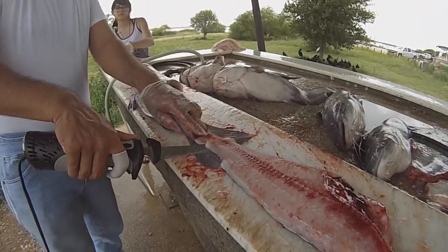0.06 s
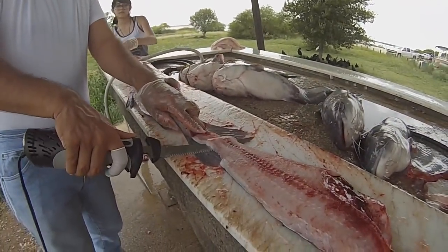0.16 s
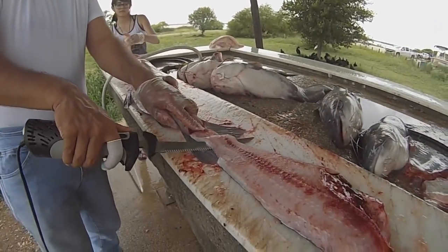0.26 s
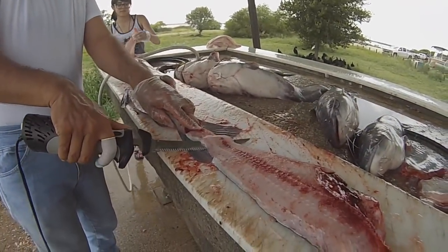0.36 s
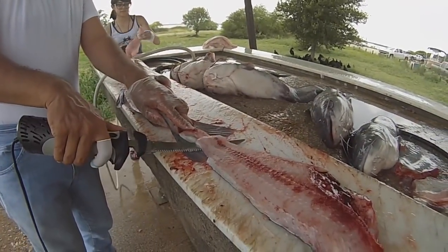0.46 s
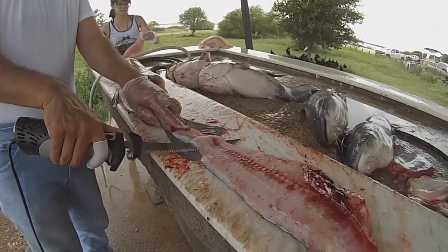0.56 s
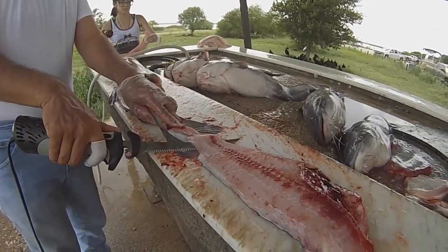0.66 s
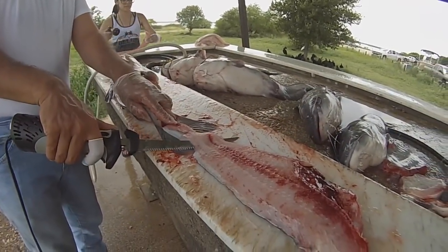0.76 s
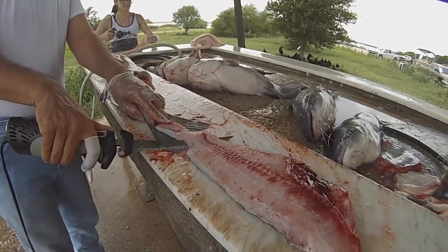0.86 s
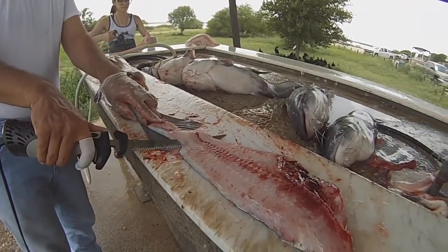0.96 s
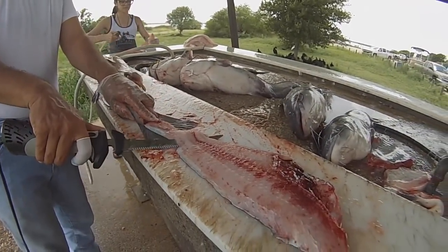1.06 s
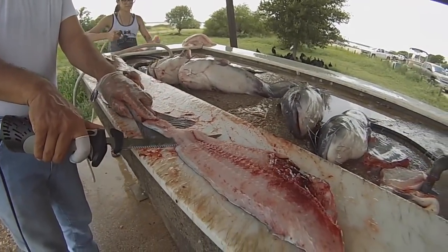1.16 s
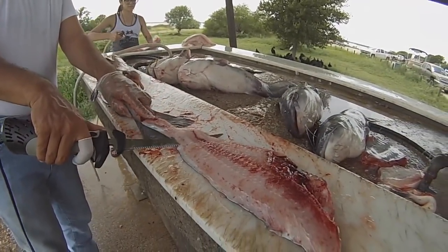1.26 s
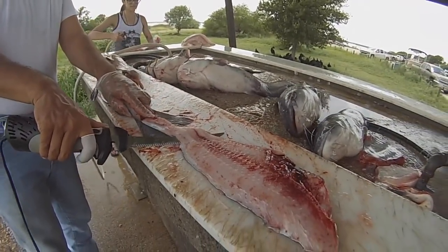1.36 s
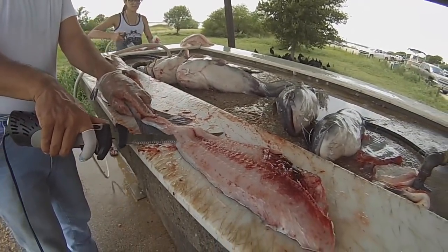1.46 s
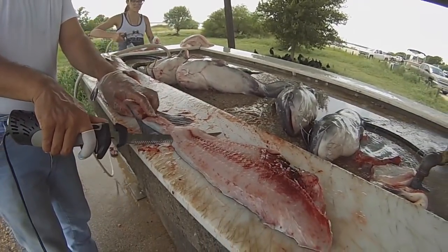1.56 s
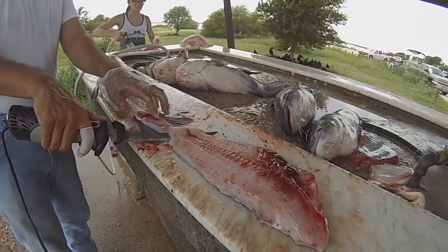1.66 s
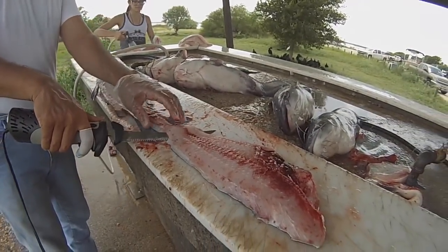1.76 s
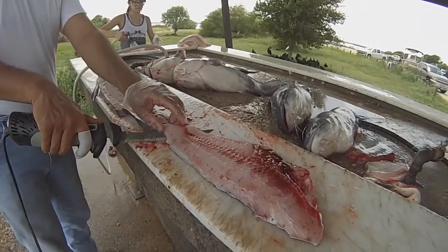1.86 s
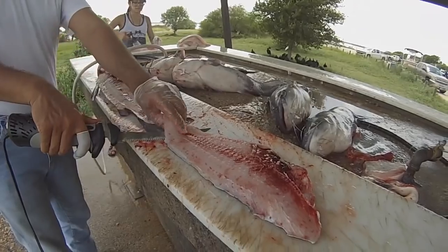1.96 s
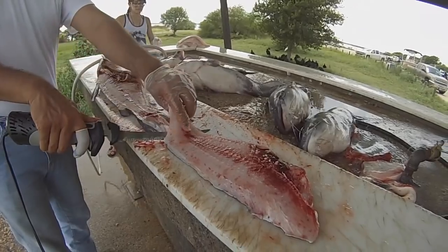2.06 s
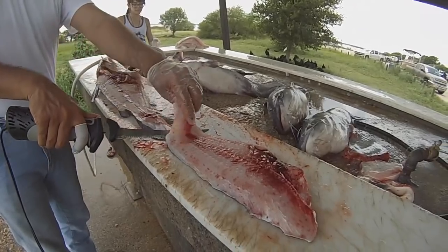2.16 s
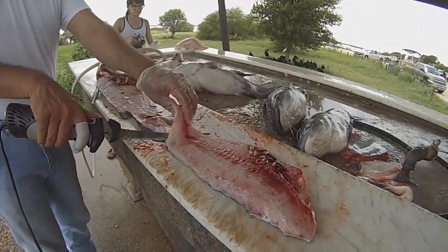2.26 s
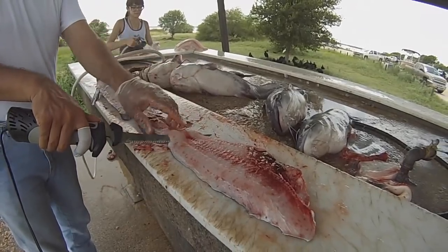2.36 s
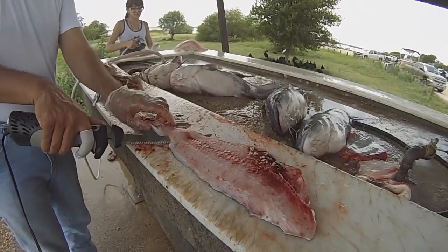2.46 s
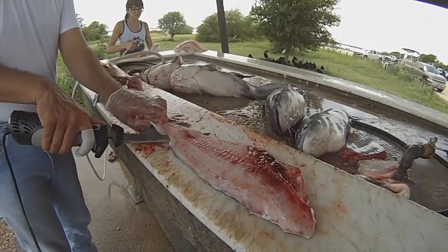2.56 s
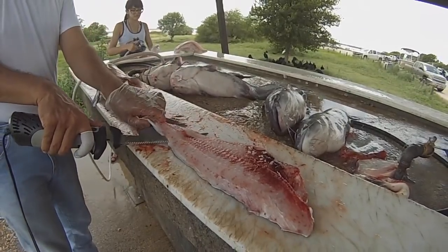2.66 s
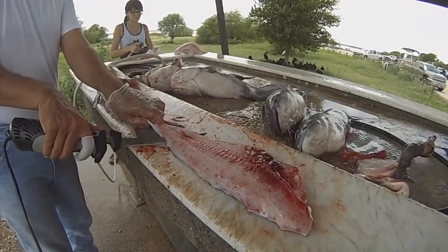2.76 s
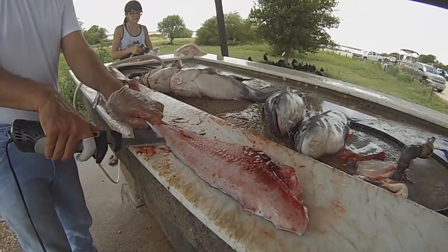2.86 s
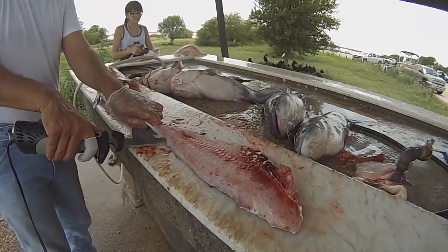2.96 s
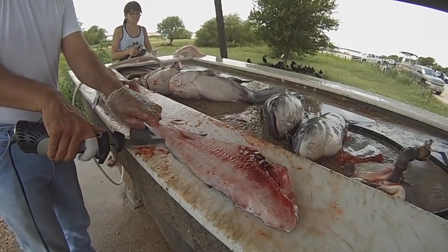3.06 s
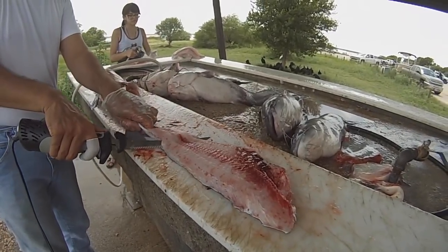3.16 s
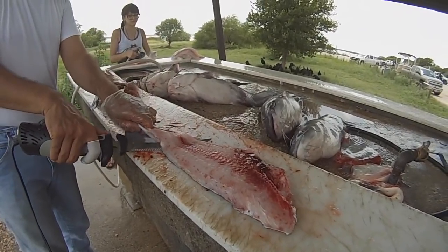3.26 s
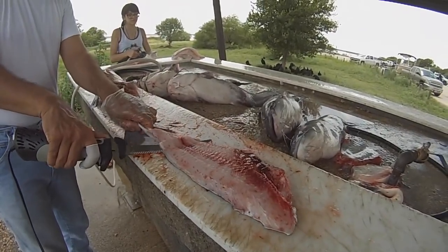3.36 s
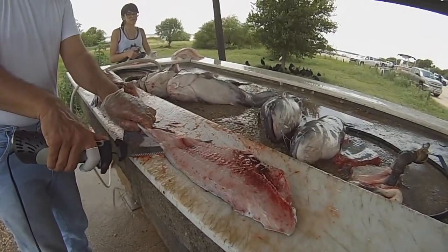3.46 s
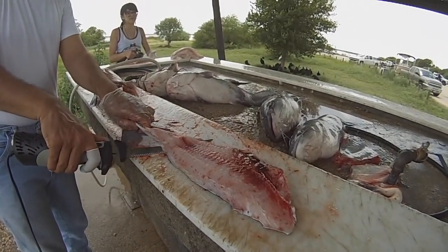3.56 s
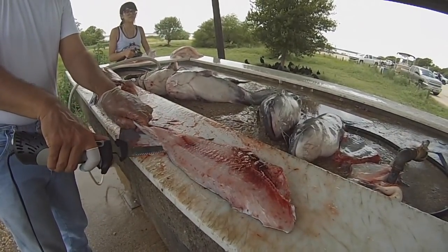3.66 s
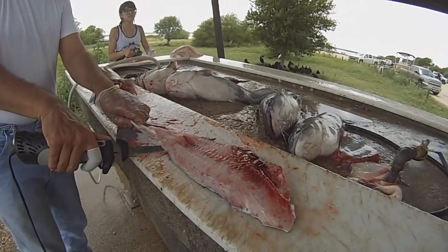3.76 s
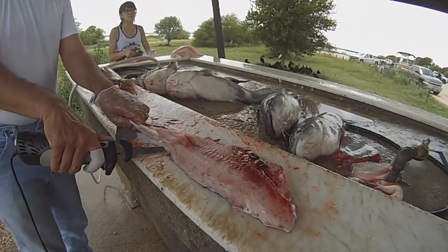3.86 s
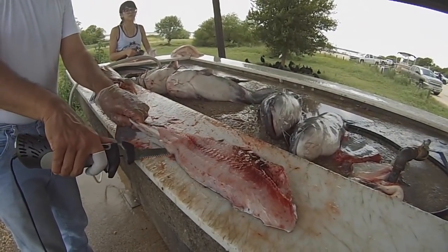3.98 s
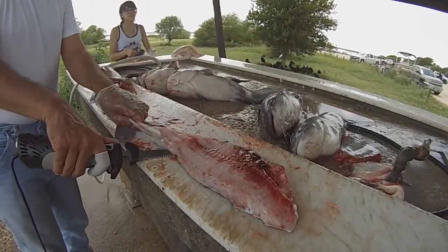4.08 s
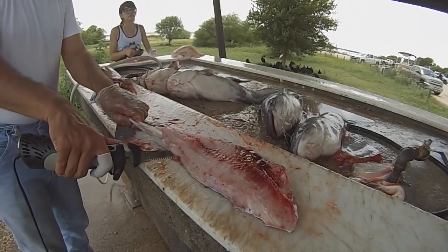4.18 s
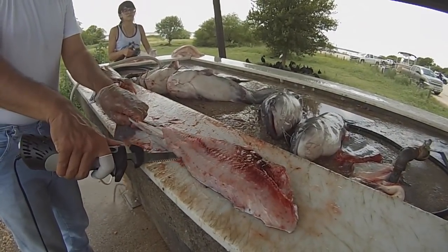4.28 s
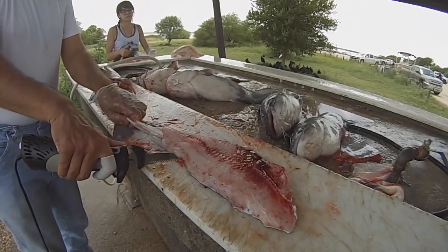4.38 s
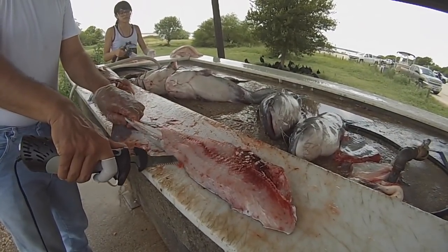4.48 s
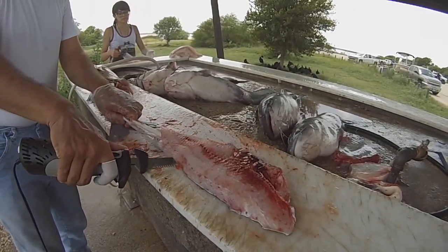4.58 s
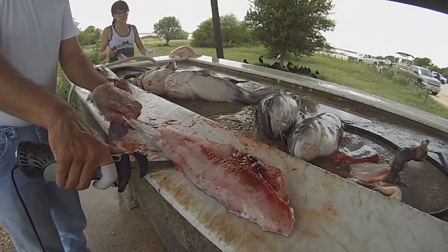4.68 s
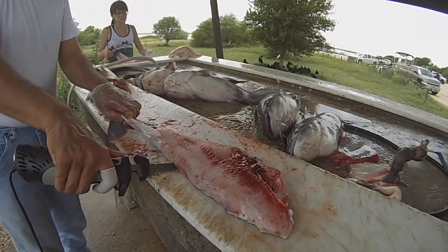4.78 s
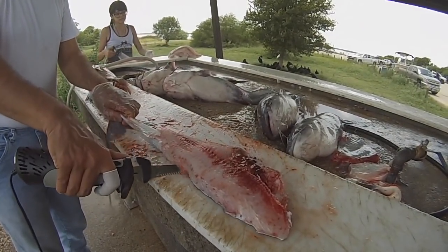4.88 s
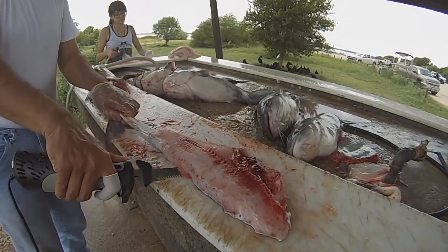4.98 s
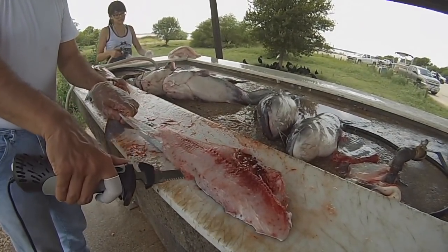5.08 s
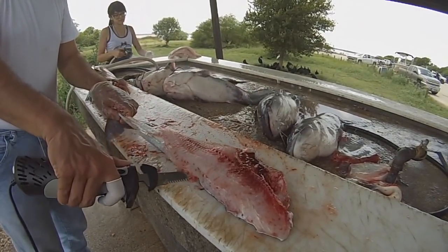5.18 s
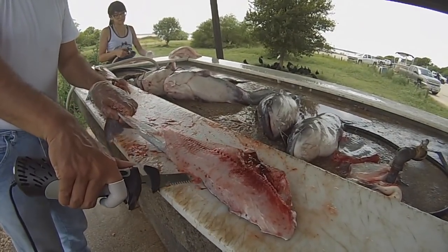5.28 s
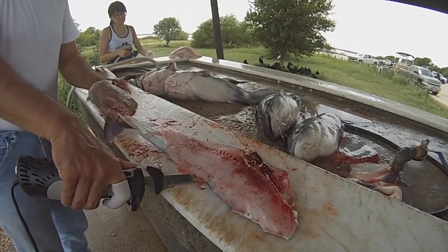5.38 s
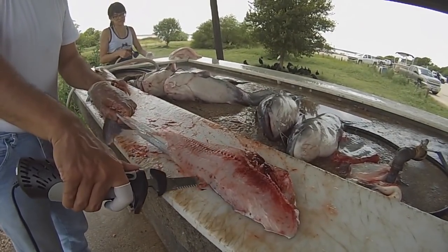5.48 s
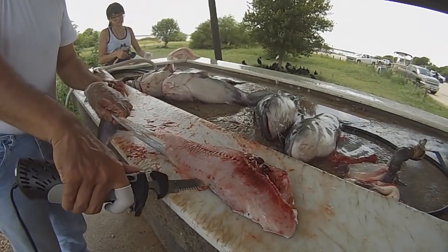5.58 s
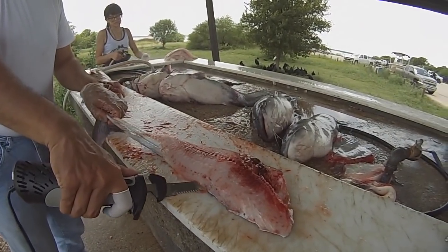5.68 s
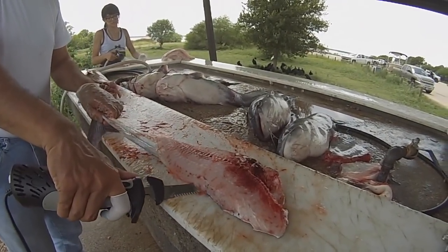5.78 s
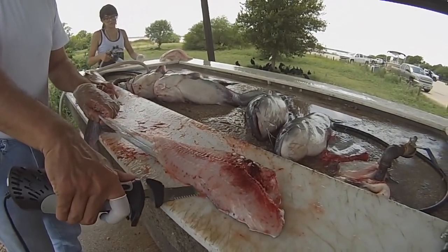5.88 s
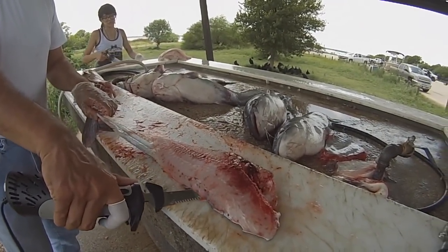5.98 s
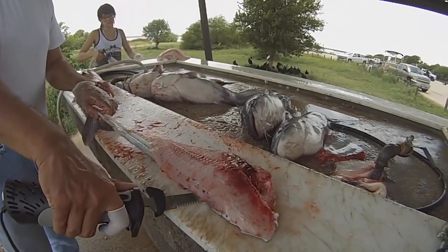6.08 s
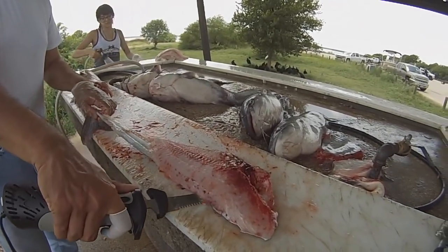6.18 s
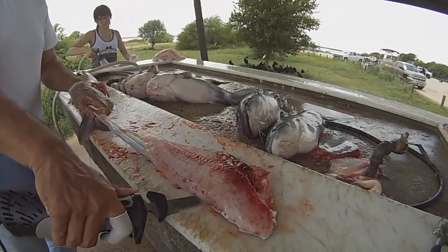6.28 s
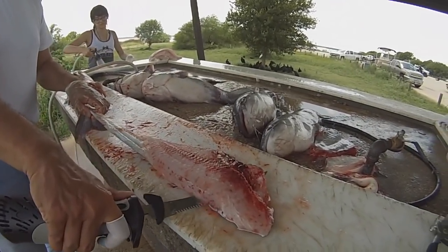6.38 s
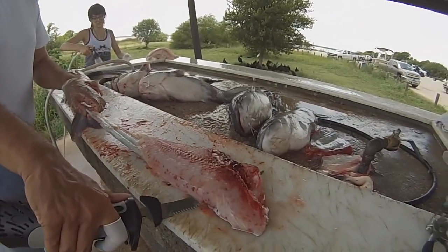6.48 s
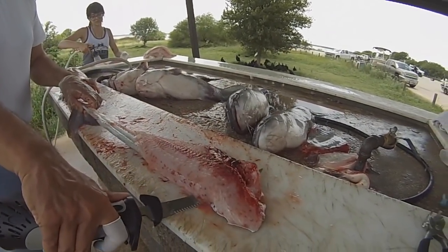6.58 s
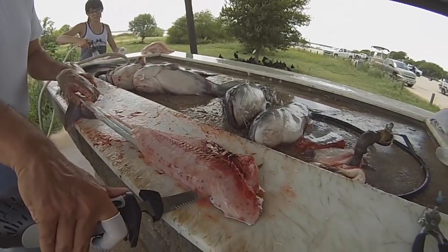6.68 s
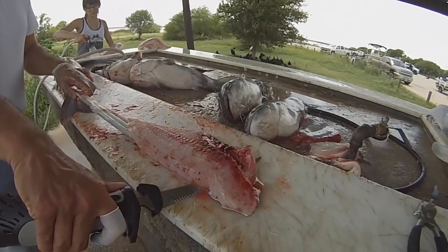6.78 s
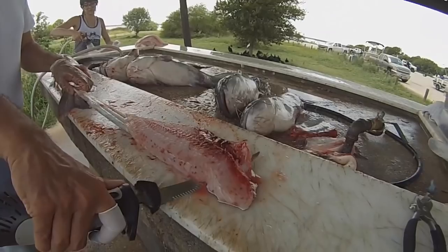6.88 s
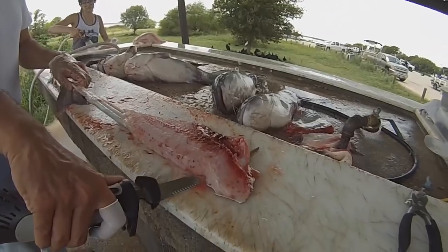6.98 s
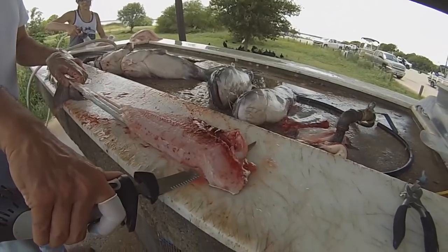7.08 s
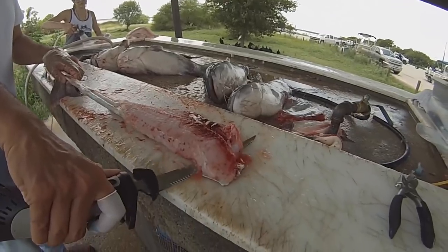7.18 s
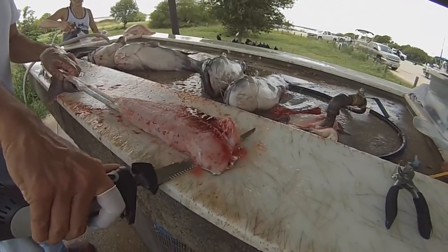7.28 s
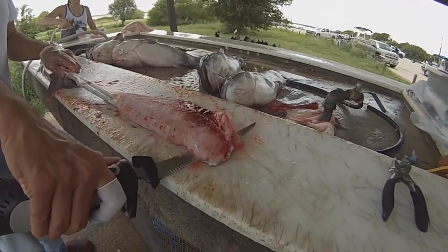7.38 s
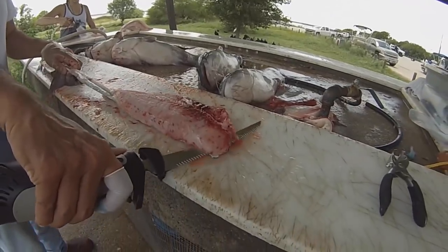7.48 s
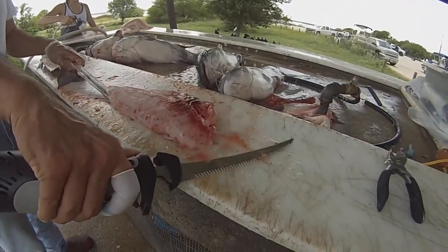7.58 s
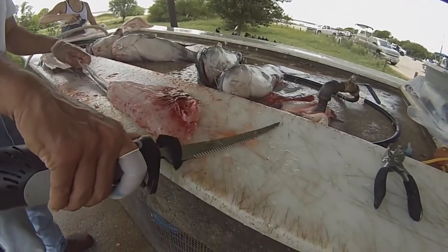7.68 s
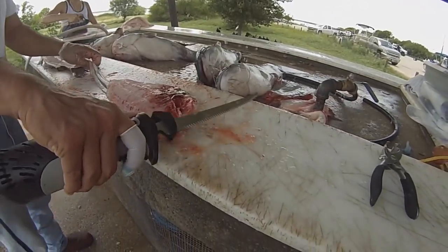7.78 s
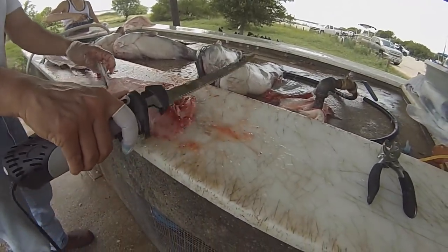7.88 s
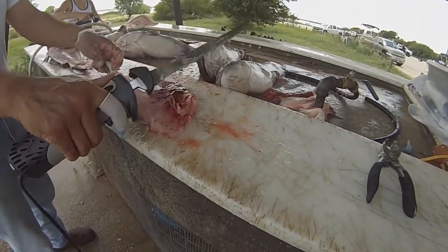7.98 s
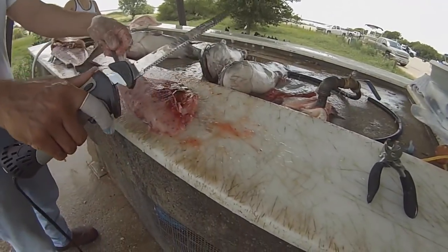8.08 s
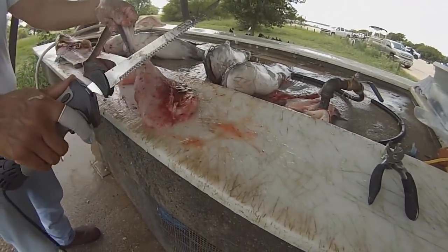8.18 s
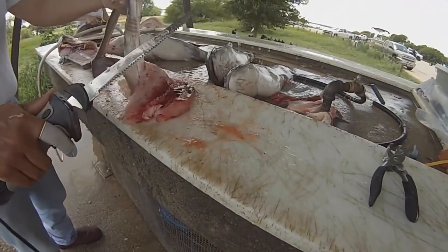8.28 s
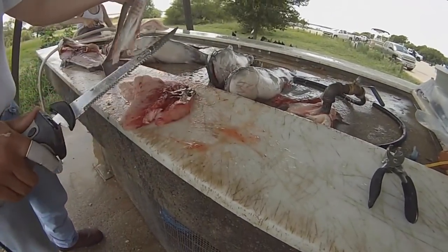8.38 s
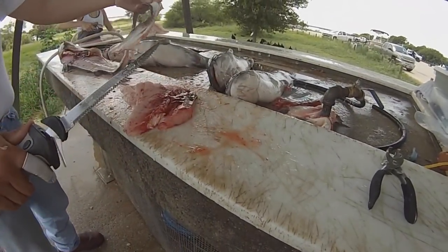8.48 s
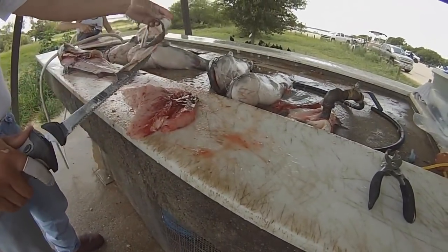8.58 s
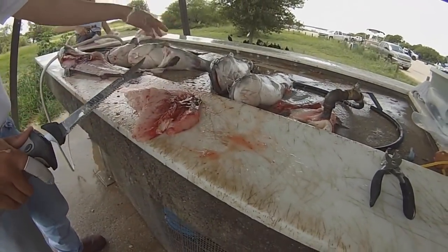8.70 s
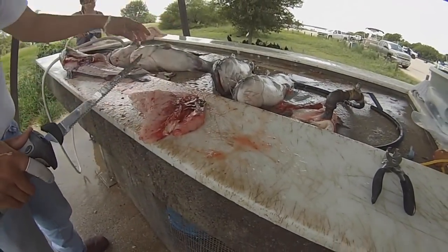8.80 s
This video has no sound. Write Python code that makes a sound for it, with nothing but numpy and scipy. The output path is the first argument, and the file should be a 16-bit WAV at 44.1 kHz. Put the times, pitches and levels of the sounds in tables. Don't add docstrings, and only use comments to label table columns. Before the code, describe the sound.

Close up, an electric fillet knife runs with a harsh plastic grind, whine and rapid clacking. The trigger is released and squeezed in short bursts, so the pitch sags and recovers. It coasts down into irregular knocks and near quiet, then a long cut grinds steadily, blades slapping, before a bright rattle, hard jolts and a slowing finish. Faint wind, insect hiss and a distant pump hum lie beneath, in open air.

```python
import sys
import numpy as np
from scipy import signal
from scipy.fft import rfft, irfft, next_fast_len
from scipy.io import wavfile
from scipy.ndimage import uniform_filter1d, map_coordinates

SR = 44100
rng = np.random.default_rng(int(sys.argv[2]) if len(sys.argv) > 2 else 0)


def digitize_waveform(pressure):
    field = np.atleast_2d(pressure).T
    bounded = np.clip(field, -1, 1)
    quanta = np.round(bounded * 32767).astype(np.int16)
    wavfile.write(sys.argv[1], SR, quanta)


def ratio_of_db(decibels):
    return 10 ** (np.asarray(decibels, float) / 20)


N = 389844
SECONDS = np.arange(N) / SR

# frequency in Hz, level in dB per Hz.
OUTDOORS = [(18, -57), (30, -5), (45, -0.5), (120, -8), (200, -16), (310, -13.5), (480, -23), (800, -17.5),
            (1300, -37), (3500, -28.5), (5500, -40), (9200, -33), (10400, -20.5), (11600, -35.5)]
# frequency in Hz, level in dB.
PUMP = [(122, -55), (152, -53.5)]
# delay in seconds, level in dB.
TABLE_ECHOES = [(.0011, -41.5), (.0027, -30), (.0052, -24.5), (.009, -22.5), (.014, -34)]

# squeezed in seconds, released in seconds.
TRIGGER = [
    (-1, .434),
    (.618, .962),
    (1.213, 1.523),
    (2.904, 7.962),
]
# time in seconds, shaft speed in Hz.
LOADED_SPEED = [(.14, 299), (.24, 355), (.8, 370), (1.4, 360), (3.1, 346), (3.6, 384.3), (4.4, 369.7),
                (5.1, 353.8), (6.2, 344.8), (6.6, 349.6), (7.1, 339.8), (7.5, 337.7), (7.8, 394)]
# time in seconds, nearness in dB, blades turned to the listener in dB,
# bite into the fish from 0 to 1, hollow of the handle in Hz.
HAND = [(0, -25, 2.5, 0.4, 1040), (.11, -24, -3.5, 0.4, 1040), (.16, -19.5, -3.5, 1, 1035),
        (.3, -25.5, 2, 0.5, 1045), (1.7, -25.5, 1, 0, 1042), (2.05, -29, 0.5, 1, 1068),
        (2.45, -28.5, -4.5, 0.4, 1050), (2.8, -24.5, -4, 0.7, 980), (3.08, -24, -1.5, 0.4, 1040),
        (3.55, -27.5, 2.5, 0, 1066), (4.45, -26.5, 0.5, .4, 1165), (4.9, -23.5, -1, 1, 1193),
        (6, -23, -1, 1, 1125), (7.5, -24, 1, 0.86, 1060), (7.75, -19.5, 0.5, 0.8, 960),
        (7.92, -19, 1, 0.5, 1160), (8.5, -22, 0, 0, 990), (8.84, -25.5, 2.5, 0, 970)]

# frequency in Hz, level in dB per Hz.
HOUSING = [(150, -34), (250, -11), (350, -13.5), (600, -4.5), (900, -3.5), (1400, -3.5), (1700, -3),
           (2050, -2.5), (2300, -6.5), (3500, -0.5), (5200, -6), (7300, -14), (9500, -18), (15500, -27.5)]
# frequency in Hz, width in Hz.
GRIP_HOLLOWS = [(920, 160), (1040, 147), (1160, 226)]
# frequency in Hz, width in Hz, lift in dB.
VENTS = [(1677, 140, 3), (2020, 61, 3), (8180, 330, 3.5), (10750, 440, 8), (14000, 1200, 7)]
# frequency in Hz, width in Hz, lift in dB.
SHELL_PEAKS = [(1020, 100, 6), (2660, 350, 10), (5250, 500, 12), (8150, 350, 9), (11950, 350, 8),
               (13800, 700, 6), (15000, 500, 4)]
# start in seconds, end in seconds, frequency in Hz, dB over the handle.
FREED_RIBS = [(.2, 1.75, 1057, -8.5), (3.0, 3.8, 1690, -13), (4.6, 5.4, 1150, -13), (5.7, 6.4, 1080, -12.5),
              (7.85, 8.35, 2000, -12.5), (8.55, 8.8, 937, -1.5)]

# multiple of shaft speed, level in dB.
WHINE = [(1, -46), (2, -54), (3, -43), (4, -49), (7.67, -52.5), (8, -52), (16, -51), (24, -60), (32, -63),
         (40, -59)]
# start in seconds, end in seconds, lift in dB, fade in seconds.
SINGING = [(.22, .38, 3, .05), (.64, .8, 3, .05), (1.3, 1.4, 3, .05), (3.15, 3.35, 3, .1),
           (6.9, 7.5, 3.5, .3)]
# frequency in Hz, level in dB.
CRANK_HUM = [(120, -53), (170, -53), (230, -60), (300, -55), (420, -47), (560, -45), (650, -49), (820, -42),
             (930, -47), (1090, -39), (1200, -43), (1350, -52)]

# frequency in Hz, width in Hz, level in dB.
SLAP_MODES = [(1150, 230, -20.5), (1970, 270, -12.5), (3710, 270, 1), (4085, 420, -1), (5130, 370, -7),
              (6460, 400, -10.5)]
# start in seconds, end in seconds, lift in dB, fade in seconds.
SLAPPING = [(.125, 0.228, 22.5, .02), (.5, 1.1, 11.5, 0.22), (1.8, 1.907, 16.5, 0.072),
            (4.6, 4.8, 17, 0.075), (4.878, 5.93, 21.5, 0.061), (4.9, 5.3, 2.5, .15),
            (6.02, 6.468, 22, 0.072), (6.543, 6.678, 16.5, 0.054), (8.252, 8.33, 16, 0.12)]
# frequency in Hz, width in Hz, level in dB.
TIP_MODES = [(7970, 130, 0)]
# start in seconds, end in seconds, lift in dB, fade in seconds.
TICKING = [(.27, .6, 8.6, 0.23), (3.9, 4.68, 11.6, 0.23), (6.7, 7.6, 5, 0.34), (7.75, 8.2, 9, 0.13)]
# frequency in Hz, width in Hz, level in dB.
RATTLE_MODES = [(5000, 1000, 5), (8000, 1000, -2), (9900, 660, 1), (13800, 1300, 0)]
# start in seconds, end in seconds, lift in dB, fade in seconds.
RATTLING = [
    (.35, .5, 10, .15),
    (3.35, 3.6, 17.5, .15),
    (7.7, 8.84, 20, 0.075),
]

# time in seconds, peak in dB, blades in dB over the handle
KNOCKS = [(2.003, -33, -6), (2.072, -10, -5), (2.095, -12, -8), (2.118, -13.5, -6), (2.168, -14, -10),
          (2.25, -12.5, -3), (2.28, -16, -7), (2.314, -15.5, -7), (2.351, -19, 0), (2.385, -16.5, -7),
          (2.4, -18.5, -5), (2.455, -31, -5), (2.49, -28, -10), (2.522, -24, -2), (2.593, -20, -4),
          (2.655, -27, 0), (2.69, -33, 2), (2.81, -29, 0), (2.896, -28, -8), (2.953, -19, -4),
          (2.981, -17, -4), (3.02, -13, -2)]
# time in seconds, peak in dB, blades in dB over the handle.
JOLTS = [(0.467, -3, 16.5), (0.994, -9, 22), (1.615, -7, 6), (1.64, -1.5, 13.5), (3.102, -5.5, -5),
         (3.132, -11, 20.5), (4.946, -0.5, 8), (4.969, -5, 14), (7.891, 1, 4), (7.912, -1, 19), (8, -6, 20),
         (8.354, -6, 7)]
# time in seconds, peak in dB, blades in dB over the handle.
LAST_KNOCKS = [(8.477, -12, 18), (8.585, -9, -18), (8.624, -10, -12), (8.669, -18, -16), (8.689, -13, -16),
               (8.711, -14, -7), (8.762, -10, 15), (8.786, -19, -11), (8.815, -8.5, 0)]

RATED_HZ = 350
TURNS_PER_REVERSAL = 4.17
SLAP_DB_PER_OCTAVE = 1


def unit(x):
    return x / np.sqrt(np.mean(x ** 2) + 1e-20)


def curves(rows):
    times, *columns = np.transpose(rows)
    return [np.interp(SECONDS, times, column) for column in columns]


def spells(rows):
    total_db = 0
    for start, end, db, fade_s in rows:
        inside_s = np.minimum(SECONDS - start, end - SECONDS)
        total_db = total_db + db * np.clip(inside_s / max(fade_s, .01) + 1, 0, 1)
    return total_db


def wobble(rate):
    coarse = np.arange(0, N + 32, 32)
    knots = rng.standard_normal(int(N * rate / SR) + 4)
    return np.interp(np.arange(N), coarse, map_coordinates(knots, [coarse * rate / SR]))


def scatter():
    return rng.uniform(-0.88, 1, N)


def spectrum_size():
    return 2 * next_fast_len(N // 2 + 4096)


def filtered(x, response):
    m = spectrum_size()
    return irfft(rfft(x, m) * response(np.fft.rfftfreq(m, 1 / SR)), m)[:N]


def colour(points):
    def response(hz):
        f, db = np.transpose(points)
        gain_db = np.interp(np.log(hz + 1), np.log(f), db)
        cepstrum = irfft(np.log(ratio_of_db(np.maximum(gain_db, -90))))
        cepstrum[1:len(hz) - 1] *= 2
        cepstrum[len(hz):] = 0
        return np.exp(rfft(cepstrum))
    return response


def modes(rows):
    def response(f):
        total = 0
        for k, (hz, width, db) in enumerate(rows):
            damping = 1j * f * width
            total = total + (-1) ** k * ratio_of_db(db) * damping / (hz * hz - f * f + damping)
        return total
    return response


def lift_db(rows, hz):
    return sum(db / (1 + ((hz - c) / (w / 2)) ** 2) for c, w, db in rows)


def bursts(sizes, decay_s, loose):
    fade = np.exp(-1 / (SR * decay_s))
    tail = signal.lfilter([1], [1, -fade], sizes) * rng.standard_normal(N)
    return sizes + loose * np.sqrt(1 - fade ** 2) * tail


def outdoors():
    air = unit(filtered(rng.standard_normal(N), colour(OUTDOORS)))
    sound = ratio_of_db(-42.5 + 0.22 * wobble(0.89)) * air
    for hz, db in PUMP:
        hum = np.sin(2 * np.pi * hz * SECONDS + 1.8 * wobble(6))
        sound += ratio_of_db(db + 1.5 * wobble(5.5)) * np.sqrt(2) * hum
    return sound


def motor():
    step_s, finger_s, start_hz = .002, .08, 294.6
    lag_at_rest_s, lag_at_rated_s = .095, .149
    friction_hz_per_s, drag_s = 160, 1.88
    s = np.arange(0, N / SR + step_s, step_s)
    power = 0
    for squeezed, released in TRIGGER:
        pressed = np.clip((s - squeezed) / finger_s + .5, 0, 1)
        power = power + pressed * np.clip((released - s) / finger_s + .5, 0, 1)
    speed = [start_hz]
    for on, aim in zip(power, np.interp(s, *np.transpose(LOADED_SPEED))):
        hz = speed[-1]
        lag_s = lag_at_rest_s + (lag_at_rated_s - lag_at_rest_s) * hz / RATED_HZ
        driven = on * (aim - hz) / lag_s
        coasting = (1 - on) * (friction_hz_per_s + hz / drag_s)
        speed.append(hz + step_s * (driven - coasting))
    return np.interp(SECONDS, s, speed[1:]), np.interp(SECONDS, s, power)


def tooth_grind(speed, stroke):
    load_db = 0.16 + 6.6 * (1 - speed / speed.max())
    chatter_db = 1.23 * wobble(250) + 0.4 * wobble(30)
    return unit(ratio_of_db(load_db * np.cos(2 * np.pi * (stroke - .2)) + chatter_db) * rng.standard_normal(N))


def crank_clacks(reversal, push_return_db):
    clacks = bursts(reversal * ratio_of_db(4.3 * scatter() + push_return_db), 0.0034, loose=4.2)
    return clacks / np.sqrt(np.abs(uniform_filter1d(clacks ** 2, size=9000)) + 1e-4)


def zones(x):
    m = spectrum_size()
    hz = np.fft.rfftfreq(m, 1 / SR)
    shell = rfft(x, m) * colour(HOUSING)(hz) * ratio_of_db(lift_db(VENTS, hz))
    low, mid, high = [1 / (1 + (hz / edge_hz) ** 10) for edge_hz in (750, 2300, 7000)]
    butt, handle, blades, vents = irfft(shell * [low, mid - low, high - mid, 1 - high], m)[:, :N]
    rings = irfft([shell * modes([(c, w, 0)])(hz) for c, w in GRIP_HOLLOWS], m)[:, :N]
    place = np.interp(curves(HAND)[-1], [c for c, w in GRIP_HOLLOWS], range(len(GRIP_HOLLOWS)))
    hollow = sum(np.sqrt(np.clip(1 - abs(place - k), 0, 1)) * ring for k, ring in enumerate(rings))
    return butt, handle + 1.55 * hollow, blades, vents


def shaken_shell(shake, octaves, power, slap_db):
    near_db, turn_db, _, _ = curves(HAND)
    handle_db = near_db + 10 * octaves + 0.56 * wobble(14)
    handle_db -= 4.5 * np.minimum(3 * power, 1) * np.minimum(octaves + 0.65, 0)
    butt_db = -11.5 + 1.4 * wobble(8) - 0.095 * spells(RATTLING)
    held_db = 0.63 * np.clip((slap_db + 34.0) / 12, 0, 1)
    blades_db = -3.5 + turn_db - held_db
    vents_db = -11.5 + 1.24 * turn_db
    parts = zones(shake)
    levels = [butt_db, 0, blades_db, vents_db]
    sound = sum(ratio_of_db(handle_db + db) * unit(part) for part, db in zip(parts, levels))
    for start, end, rib_hz, db in FREED_RIBS:
        rib = unit(signal.lfilter(*signal.iirpeak(rib_hz, 14, SR), parts[1]))
        sound += ratio_of_db(handle_db + db - 30 + spells([(start, end, 30, .15)])) * rib
    return sound


def slow_gain(db):
    return np.repeat(ratio_of_db(db), 16)[:N]


def armature_whine(speed, turns, stroke, octaves, power):
    bite = curves(HAND)[2]
    whine_db = 7.5 * octaves - 2.5 * (1 - power)
    sing_db = spells(SINGING)
    shaft_db = 2.5 * (bite - .25) + 1.4 * (1 - power)
    shake = np.sin(2 * np.pi * stroke)
    sound = np.zeros(N)
    for multiple, db in WHINE:
        phase = 2 * np.pi * multiple * turns + .012 * multiple * shake + .5 * wobble(25)
        level_db = whine_db + (sing_db if multiple > 4 else shaft_db) + 1.2 * wobble(6)
        peak_db = lift_db(SHELL_PEAKS, multiple * speed[::16])
        sound += slow_gain(db + level_db[::16] + peak_db) * np.sin(phase)
    return np.sqrt(2) * sound


def crank_hum(speed, stroke, octaves):
    bite = curves(HAND)[2]
    hum_db = 12 * octaves + 9.5 * (bite - 1) + 1.5
    sound = np.zeros(N)
    for multiple in range(4, 31):
        hz = multiple * speed[::16] / TURNS_PER_REVERSAL / 2
        db = np.interp(hz, *np.transpose(CRANK_HUM))
        level_db = (hum_db + 3 * wobble(1.6))[::16]
        sound += slow_gain(db + level_db) * np.sin(np.pi * multiple * stroke + 2 * wobble(3))
    return np.sqrt(2) * sound


def blade_slaps(reversal, push_return_db, slap_db):
    slaps = bursts(reversal * ratio_of_db(1.8 * scatter() + .6 * push_return_db), .001, loose=.2)
    return ratio_of_db(slap_db) * unit(filtered(slaps, modes(SLAP_MODES)))


def blade_rattle(reversal, octaves):
    rattles = bursts(reversal * ratio_of_db(9 * scatter()), .0012, loose=4)
    level_db = -54.5 + spells(RATTLING) + SLAP_DB_PER_OCTAVE * octaves
    return ratio_of_db(level_db) * unit(filtered(rattles, modes(RATTLE_MODES)))


def tip_ticks(push_ends, octaves):
    ticks = bursts(push_ends * ratio_of_db(5.5 * scatter()), 0.0015, loose=0.13)
    level_db = -52.5 + SLAP_DB_PER_OCTAVE * octaves + spells(TICKING)
    return ratio_of_db(level_db) * unit(filtered(ticks, modes(TIP_MODES)))


def knife():
    speed, power = motor()
    octaves = np.log2(speed / RATED_HZ)
    turns = np.cumsum(speed) / SR
    stroke = turns / TURNS_PER_REVERSAL + .74
    reversal = np.diff(np.floor(stroke + .012 * wobble(40)), prepend=0) > 0
    pushing = np.floor(stroke + .5) % 2 == 0
    push_return_db = np.where(pushing, 0, -3 + 2.8 * wobble(3.15))
    slap_db = -48.5 + SLAP_DB_PER_OCTAVE * octaves + spells(SLAPPING)
    bite = curves(HAND)[2]
    clack_db = -4 - 2.5 * bite + 13 * np.minimum(octaves + .3, 0)
    clack_db += 0.17 * spells(RATTLING) - .1 * spells(TICKING)
    share = ratio_of_db(clack_db)
    shake = tooth_grind(speed, stroke) + share * crank_clacks(reversal, push_return_db)
    sound = shaken_shell(shake / np.sqrt(1 + share ** 2), octaves, power, slap_db)
    sound += armature_whine(speed, turns, stroke, octaves, power)
    sound += crank_hum(speed, stroke, octaves)
    sound += blade_slaps(reversal, push_return_db, slap_db)
    sound += blade_rattle(reversal, octaves)
    return sound + tip_ticks(reversal * pushing, octaves)


def knocks():
    blows, bright_db = np.zeros(N), np.zeros(N)
    for s, peak_db, blades_db in KNOCKS + JOLTS + LAST_KNOCKS:
        blows[round(s * SR)] = ratio_of_db(peak_db + 10.5)
        bright_db[round(s * SR) - 40:] = blades_db - 17
    butt, handle, blades, vents = zones(bursts(blows, 0.0037, loose=2.27))
    ring = signal.lfilter(*signal.iirpeak(1040, 9, SR), handle)
    return 0.81 * butt + handle + 0.91 * ring + ratio_of_db(bright_db) * (blades + vents)


def scene():
    near = knife() + knocks()
    echoes = sum(ratio_of_db(db) * np.pad(near, (round(s * SR), 0))[:N] for s, db in TABLE_ECHOES)
    return (0.69 * (near + echoes) + outdoors())[None]


def band_limit(x):
    return signal.sosfilt(signal.butter(12, 15730, fs=SR, output="sos"), x)


def record(dry):
    held = dry[0] / (1 + abs(dry[0] / .75) ** 4) ** .25
    mix = filtered(held, lambda hz: 1 / (1 + (hz / 15300) ** 300))[None]
    return band_limit(mix)


dry = scene()
out = record(dry)
digitize_waveform(out)
```